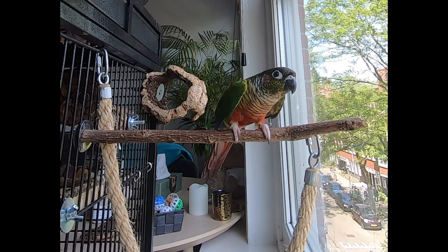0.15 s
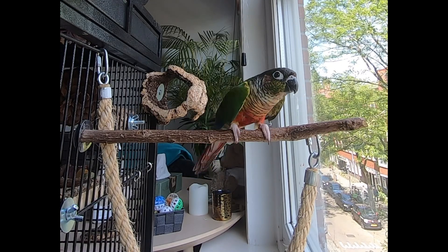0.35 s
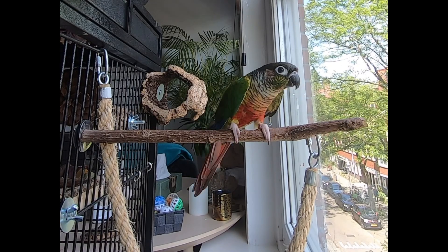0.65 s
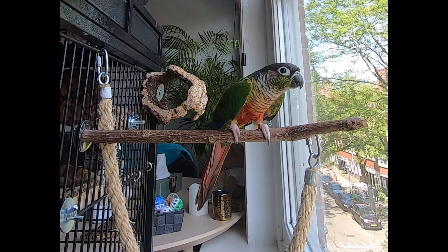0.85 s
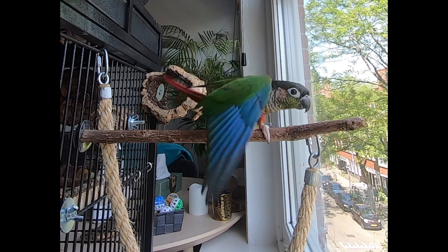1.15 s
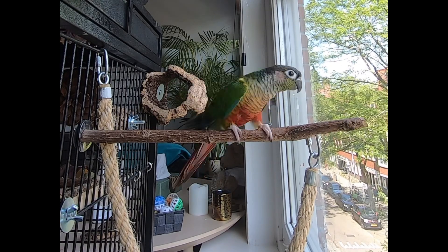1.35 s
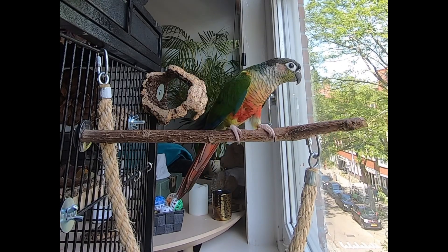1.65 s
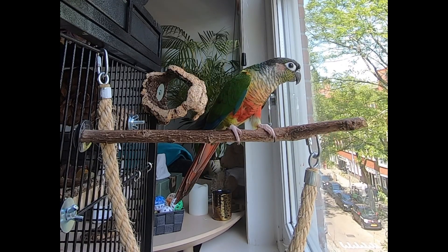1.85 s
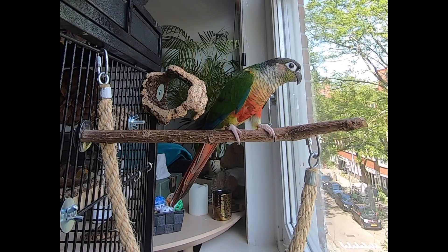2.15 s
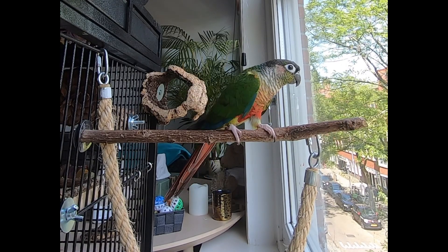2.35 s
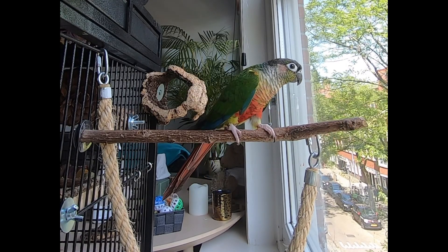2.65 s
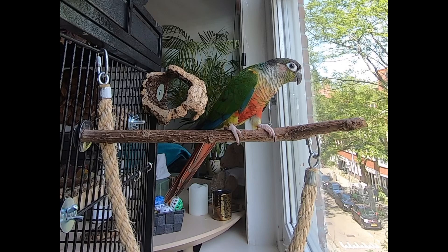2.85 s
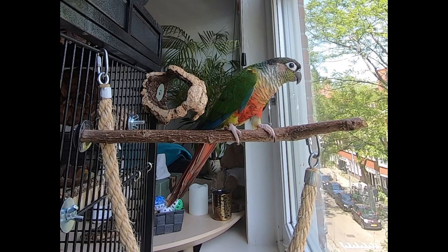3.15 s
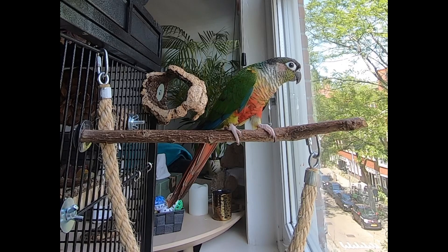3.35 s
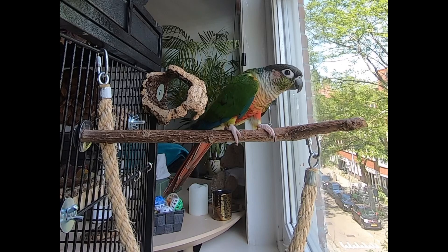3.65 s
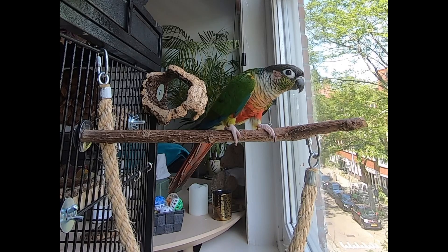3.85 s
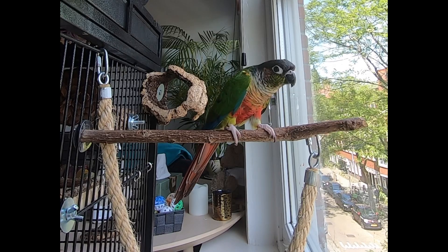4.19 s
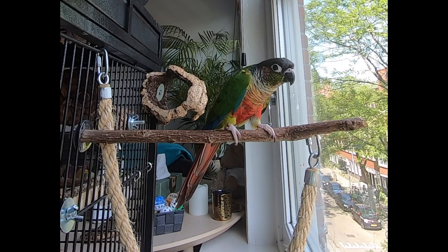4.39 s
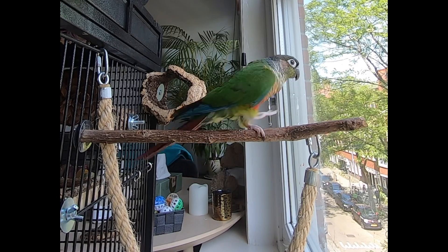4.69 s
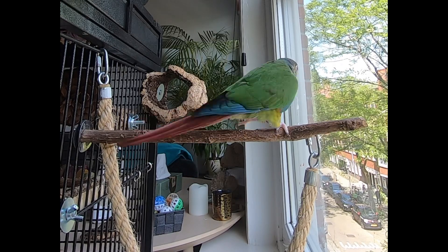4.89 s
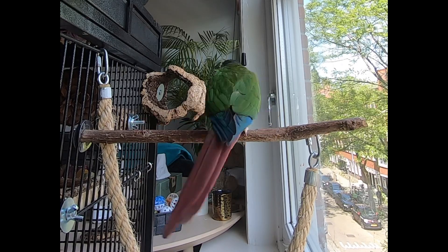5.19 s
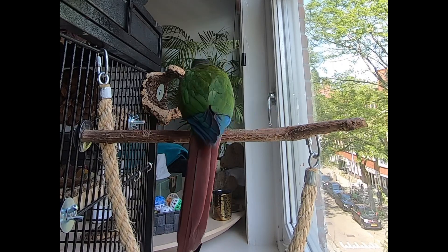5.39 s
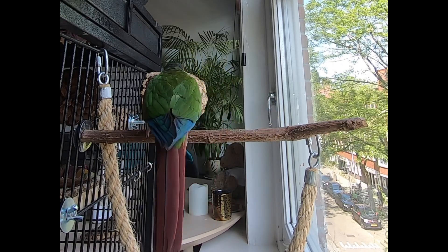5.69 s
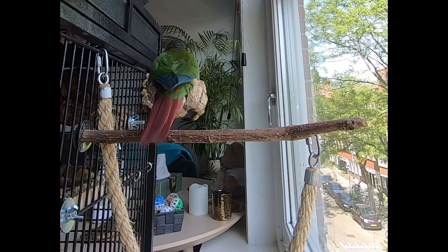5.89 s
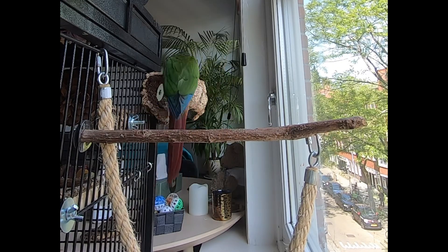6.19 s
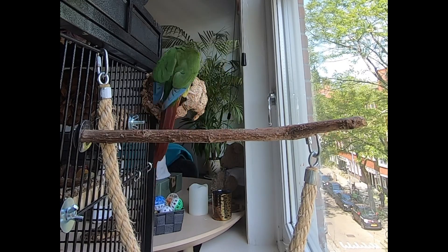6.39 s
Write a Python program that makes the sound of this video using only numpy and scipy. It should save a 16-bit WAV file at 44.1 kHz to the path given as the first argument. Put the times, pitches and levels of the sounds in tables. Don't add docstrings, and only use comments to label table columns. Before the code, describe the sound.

A small parrot close to the microphone lets out five very loud, shrill shrieks, each a fifth of a second, a whistle cracking into a harsh rasp. The hard room rings briefly after each. Between them are faint beak clicks, perch thumps and creaks over low traffic hum. Finally the shrieking stops and claws tick along wood, then scratch and knock on a wicker basket.

```python
import sys
import numpy as np
from scipy import signal
from scipy.fft import rfft, irfft, next_fast_len
from scipy.io import wavfile
from scipy.ndimage import uniform_filter1d, minimum_filter1d, map_coordinates

SR = 44100
rng = np.random.default_rng(int(sys.argv[2]) if len(sys.argv) > 2 else 0)


def to_wav(sig):
    pcm = np.clip(np.atleast_2d(sig), -1, 1) * 32767
    pcm = np.round(pcm).astype(np.int16)
    wavfile.write(sys.argv[1], SR, pcm.T)


def ratio_of_db(decibels):
    return 10 ** (np.asarray(decibels, float) / 20)


N = 287973


def unit(x):
    return x / np.sqrt(np.mean(x ** 2) + 1e-20)


def along(points, hz):
    f, v = np.transpose(points)
    return np.interp(np.log(hz + 1), np.log(f + 1), v)


def curves(rows):
    s, *cols = np.transpose(rows)
    return [np.interp(np.arange(N) / SR, s, c) for c in cols]


def wobble(rate):
    knots = rng.standard_normal(int(N * rate / SR) + 4)
    return map_coordinates(knots, [np.arange(N) * rate / SR])


def tremor(rate):
    return np.tanh(wobble(rate))


def filtered(x, response):
    m = next_fast_len(N + SR // 2)
    return irfft(rfft(x, m) * response(np.fft.rfftfreq(m, 1 / SR)), m)[..., :N]


def modes(table):
    def response(f):
        return sum((-1) ** k * ratio_of_db(db) * 1j * f * width / (hz * hz - f * f + 1j * f * width)
                   for k, (hz, width, db) in enumerate(table))
    return response


def highpass(f, corner_hz):
    return (1j * f / corner_hz / (1 + 1j * f / corner_hz)) ** 2


def mix_in(track, at, sound):
    track[..., at:at + sound.shape[-1]] += sound[..., :N - at]


# start_s, length_s, rasp_db, rasp_low_band_db, held_note_roughness (0-1)
SHRIEKS = [(.263, .195, -25.5, -13, .06), (.838, .202, -25, -7.5, .06), (2.26, .196, -23.5, -1, .25),
           (3.577, .18, -24, -4, .25), (4.651, .196, -25, -3, .2)]
# scoop_hz, opening_hz, dip_s (into the call), dip_hz, last_hz
TUNES = [(3650, 3560, .043, 2050, 4000), (3700, 3760, .045, 2300, 3820), (3300, 3550, .037, 2650, 4130),
         (2600, 3900, .044, 2280, 4170), (2800, 3450, .045, 2170, 4180)]
# opening_db, before_break_db, in_dip_db, held_db, last_db
EFFORT = [(-19.5, -21, -17, -17.5, -29.5), (-21, -28, -21, -20, -24.5), (-21, -19, -20.5, -20, -26.5),
          (-23, -24, -16.5, -24, -21.5), (-16, -26, -14, -18, -24)]
# start_hz, dip_hz, end_hz
THROAT_HZ = [(6595, 6230, 6550), (6130, 6250, 6560), (7170, 6600, 6760), (6930, 6700, 6800),
             (6590, 6800, 7140)]
GAPE_DIP_DB = [10.5, -1, -4, -3, 1]
ATTACK_S, RELEASE_S, EDGE_DB = .011, .01, -12
BREAK_S, SNAP_S, CLIMB_S, SETTLE_S = .015, .004, .011, .028


def phrase(shape):
    points = []
    for call in zip(SHRIEKS, TUNES, EFFORT, THROAT_HZ, GAPE_DIP_DB):
        start = call[0][0]
        points += [(start + s, *values) for s, *values in shape(*call)]
    return curves(points)


def sounding(fade):
    t = np.arange(N) / SR
    return sum(np.clip(np.minimum(t - s, s + length - t) / fade, 0, 1) for s, length, *_ in SHRIEKS)


def tune_of(call, tune, *_):
    _, length, _, _, held = call
    scoop, opening, dip_s, dip, last = tune
    rough_open, rough_break, rough_dip, rough_end = .07, .27, .15, .26
    break_hz, climb_hz, leap_hz, settle_hz = 2700, 3000, 3250, 3700
    scoop_s = abs(opening - scoop) / 9e4
    glide = lambda share: settle_hz + share * (last - settle_hz)
    middle = .15 + 2.2 * held
    return [(0, scoop, rough_break),
            (SNAP_S + scoop_s, opening, rough_open),
            (dip_s - BREAK_S - SNAP_S, opening, rough_open),
            (dip_s - BREAK_S, break_hz, rough_break),
            (dip_s, dip, rough_dip),
            (dip_s + CLIMB_S, climb_hz, rough_break),
            (dip_s + SETTLE_S - SNAP_S, leap_hz, rough_break),
            (dip_s + SETTLE_S, settle_hz - 600 * held, held),
            (.62 * length, glide(middle), held),
            (.78 * length, glide(.88), .2),
            (length, last, rough_end)]


def effort_of(call, tune, effort, throat, gape_db):
    length, dip_s = call[1], tune[2]
    opening, lull, push, held, last = effort
    gape_open, gape_held = 2.5, -3.5
    return [(0, opening + EDGE_DB, gape_open),
            (ATTACK_S, opening, gape_open),
            (dip_s - BREAK_S - SNAP_S, lull, gape_open),
            (dip_s, push, gape_db),
            (dip_s + 1.5 * SETTLE_S, held, gape_held),
            (length - RELEASE_S, last, gape_held),
            (length, last + .5 * EDGE_DB, gape_held)]


# multiple (of the pitch), level_db
OVERTONES = [(1, 0.5), (2, -1), (3, -20), (4, -28)]
# freq_hz, gain_db
THROAT = [(1500, -9), (2300, 8.5), (3800, 4), (4300, -0.5), (5200, -8.5), (6500, -3.5), (7600, -9),
          (8400, -3), (9300, -18), (11000, -24), (14000, -4.5)]


def whistle():
    hz, rough = phrase(tune_of)
    db, gape_db = phrase(effort_of)
    slide = uniform_filter1d(abs(np.gradient(hz)), size=300) * SR
    rough = rough + np.clip(slide / 4e5, 0, .2)
    shake = rough * (.13 * wobble(1000) + .08 * wobble(260))
    phase = 2 * np.pi * np.cumsum(hz * (1 + shake)) / SR
    tone = np.zeros(N)
    for k, level in OVERTONES:
        partial_db = level + (k > 1) * gape_db + along(THROAT, k * hz)
        tone += ratio_of_db(partial_db) * np.sin(k * phase)
    flutter = ratio_of_db(6.2 * tremor(130) + 20 * rough * (tremor(330) - 1.0))
    return ratio_of_db(db - 2.0) * flutter * tone * sounding(.003)


def rasp_of(call, tune, effort, throat, _):
    _, length, db, low, _ = call
    dip_s = tune[2]
    first, mid, last = throat
    high, bright = -16, -16 + 6.5
    return [(0, db + EDGE_DB - 2, first, low + 4, high),
            (ATTACK_S, db - 4, first, low + 4, high),
            (dip_s - BREAK_S - SNAP_S, db - 5.5, first, low, high),
            (dip_s + CLIMB_S, db, mid, low, high),
            (length - RELEASE_S, db - 3.5, last, low - 3, bright),
            (length, db + EDGE_DB + 3.5, last, low - 3, bright)]


# freq_hz, density_db (per Hz)
BREATH = [(290, -71.5), (500, -42.5), (927, -39), (1390, -22), (2130, -15.5), (2970, -7.5), (3330, -8),
          (3730, -1), (4840, -18), (6730, -10.5), (9640, -18), (11400, -43), (15500, -38.5)]


def rasp():
    db, throat_hz, low_db, high_db = phrase(rasp_of)
    shake = .44 * (.085 * wobble(1300) + .035 * wobble(250))
    phase = np.pi * np.cumsum(throat_hz * (1 + shake)) / SR
    split = np.cos(2 * np.pi * np.cumsum(450 + 150 * wobble(90)) / SR)
    low = ratio_of_db(low_db + 1.8 * tremor(700)) * np.sin(phase) * (0.32 + 1.5 * split)
    middle = ratio_of_db(7.2 * tremor(500)) * np.sin(2 * phase)
    high = ratio_of_db(high_db + 5.6 * tremor(400)) * np.sin(3 * phase)
    hiss = unit(filtered(rng.standard_normal(N), lambda hz: ratio_of_db(along(BREATH, hz))))
    body = low + middle + high + ratio_of_db(-1.5) * hiss
    return ratio_of_db(db + 3.4 * tremor(230)) * body * sounding(.004)


# start_s, peak_db, ring_hz
ONSETS = [(0.2461, -37, 1400), (0.2548, -24, 1900), (.261, -29.5, 2300), (0.8261, -36.5, 1500),
          (0.832, -26.5, 2400), (2.2396, -32.5, 1500), (2.248, -25.5, 1900), (3.5626, -33, 1400),
          (3.5698, -33, 2200), (3.576, -21.5, 2000), (4.633, -42, 1500), (4.6418, -21.5, 1600),
          (4.6534, -20.5, 2400)]
# freq_hz, level_db
WINDPIPE = [(3500, -6.5), (5000, -13), (6500, -11.5), (9200, -23)]


def flaps():
    out, t = np.zeros(N), np.arange(SR // 50) / SR
    for s, db, hz in ONSETS:
        ring = np.sin(2 * np.pi * hz * t)
        for f, level in WINDPIPE:
            ring += ratio_of_db(level + rng.normal(0, 2.1)) * np.sin(2 * np.pi * f * rng.normal(1, 0.065) * t)
        breathy = 1 + 2.1 * uniform_filter1d(rng.standard_normal(len(t)), size=12)
        envelope = ratio_of_db(db + 12.0 - 60 * t / .011) * (1 - np.exp(-t / 0.00093)) ** 2
        mix_in(out, round(s * SR), envelope * ring * breathy)
    return filtered(out, lambda f: highpass(f, 1100) / (1 + 1j * f / 7000) ** 3)


def padded(table, top_hz):
    return lambda f: modes(table)(f) / (1 + 1j * f / top_hz) ** 2


# start_s, peak_db, ring_hz
BEAK = [(0.2149, -46, 8000), (3.277, -45.5, 8160), (3.3548, -42.5, 6920), (4.4433, -45.5, 7950),
        (5.2904, -44, 6800)]
# start_s, peak_db, ring_hz
CLAWS = [(1.8007, -58.5, 2706), (1.8594, -60, 2800), (1.9944, -66, 3120), (4.4301, -60, 2540),
         (5.2514, -57.5, 3600), (5.448, -57.5, 2760), (5.5374, -60.5, 3150), (5.5895, -61, 5760),
         (5.7012, -66.5, 4950), (5.725, -56.5, 3110), (5.7774, -62.5, 4910), (5.8197, -62.5, 4465),
         (5.8786, -61, 2444), (5.9295, -54, 2880), (5.9943, -41, 3000)]
# start_s, peak_db, ring_hz
BASKET = [(1.42, -55, 1610), (2.8302, -56, 4500), (6.0516, -41, 3370), (6.0671, -42, 3150),
          (6.099, -46, 2830), (6.1489, -51, 2630), (6.2347, -56, 3070), (6.254, -49, 4940),
          (6.2936, -42.5, 3190), (6.3201, -52.5, 2800), (6.3875, -45, 3235), (6.4144, -63, 3210),
          (6.4964, -51.5, 3200)]
# freq_hz, width_hz, level_db
WICKER = [(750, 350, -3), (1450, 68, 7.5), (1550, 150, 5.5), (2186, 700, 0)]
# freq_hz, width_hz, level_db
PERCH = [(173, 29, 1), (230, 20, 3.5), (443, 270, -12.5)]
# freq_hz, density_db (per Hz)
FEATHERS = [(500, -25.5), (1000, -2.5), (1800, -1), (3500, -3.5), (4500, 0), (7500, -3), (9500, -7),
            (11000, -26.5), (13000, -57)]
# freq_hz, width_hz, level_db
CAGE = [(3400, 160, 5), (4500, 160, 8)]


def contacts():
    tick, knock, thud = np.zeros((3, N))
    scuff, scrape = np.zeros((2, 2, N))
    t = np.arange(SR // 4) / SR
    # wicker knock dB, perch thud dB, scuff dB, wicker scrape dB.
    kinds = [(BEAK, (-27, -14, -15.5, -40)), (CLAWS, (-18.5, 0, -14, -30.5)), (BASKET, (-9, -14, -18, -8.5))]
    events = [row + mix for rows, mix in kinds for row in rows]
    for s, db, hz, knock_db, thud_db, scuff_db, scrape_db in events:
        at, noise = round(s * SR), rng.standard_normal((3, len(t)))
        contact_s = .0002 * (8000 / hz) ** 2
        strike = ratio_of_db(db + 5 - 60 * t / (0.0081 + 6 * contact_s)) * (1 - np.exp(-t / contact_s))
        mix_in(tick, at, strike * (0.35 * np.sin(2 * np.pi * hz * t) + 0.6 * noise[2]))
        peak = signal.lfilter(*signal.iirpeak(hz, 3.5, SR), noise[:2])
        band = signal.butter(1, [.4 * hz, min(2.2 * hz, 12000)], 'band', fs=SR)
        fibres = peak + 0.5 * signal.lfilter(*band, noise[:2])
        mix_in(scuff, at, ratio_of_db(db + scuff_db + 9.5 - 60 * t / 0.43) * (1 - np.exp(-t / 0.004)) * fibres)
        mix_in(scrape, at, ratio_of_db(db + scrape_db - 60 * t / .4) * (1 - np.exp(-t / .008)) * noise[:2])
        knock[at] = ratio_of_db(db + knock_db + 38)
        thud[at] = ratio_of_db(db + thud_db + 36.0)
    bright = filtered(tick, lambda f: highpass(f, 1800) / (1 + 1j * f / 9000 - (f / 10000) ** 2) ** 3)
    ticks = bright + filtered(knock, padded(WICKER, 2700))
    thuds = filtered(thud, padded(PERCH, 500))
    feathers = filtered(scuff * ratio_of_db(4.4 * tremor(120)),
                        lambda hz: ratio_of_db(along(FEATHERS, hz)) * (1 + modes(CAGE)(hz)))
    wicker = filtered(scrape * ratio_of_db(5 * tremor(43)), modes(WICKER[1:]))
    return ticks, thuds, feathers + wicker


# start_s, peak_db, creak_db
STEPS = [(0.664, -52, -7.5), (1.088, -46, -10.5), (1.17, -40, -11.5), (1.438, -46.5, -14),
         (3.497, -54, -20.5), (5.09, -43, -21), (5.129, -50, -19), (5.221, -45, -18.5),
         (5.319, -44.5, -14.5), (5.382, -54, -22.5)]
# freq_hz, width_hz, level_db
CREAK = [(396, 120, 2), (635, 74, 1.5), (851.4, 58, -9)]


def weight_shifts():
    thud, creak = np.zeros((2, N))
    for s, db, creak_db in STEPS:
        at = round(s * SR)
        thud[at], creak[at] = ratio_of_db(db + 38.0), ratio_of_db(db + creak_db + 44)
    t = np.arange(SR // 4) / SR
    strain = ratio_of_db(-60 * t / 0.2) * (1 - np.exp(-t / .004)) * rng.standard_normal(len(t))
    creak = signal.fftconvolve(creak, strain / np.linalg.norm(strain))[:N]
    return filtered(thud, padded(PERCH, 500)) + filtered(creak, padded(CREAK, 1200))


# time_s, left_minus_right_db, left_lag_samples, left_echo_ms, right_echo_ms
HEAD = [(.3, -0.8, 0.51, 0.51, 0.75), (1, -0.14, 0.73, .7, .6), (2.3, 1.5, 0.93, .45, 0.37),
        (3.6, 1.2, .3, 0.48, 0.35), (4.7, 1.6, .3, .38, 0.41), (6.2, 1.1, 0.066, .8, 0.52)]
# delay_ms, left_gain, right_gain
NEAR = [(.2, 0.09, -0.1), (1.1, 0.12, -0.29), (1.7, -0.059, 0.6), (3.1, 0.35, -0.32), (5.6, .1, 0.14),
        (9.3, .2, 0.2)]
# freq_hz, left_minus_right_db
PORTS = [(60, -1), (150, 2.5), (380, 3), (950, -7), (2380, 4), (5980, -7), (15000, -3)]


def direct(x):
    pan_db, lag, *pane_ms = curves(HEAD)
    late = lambda samples: map_coordinates(x, [np.arange(N) - samples])
    pair = np.array([ratio_of_db(side * pan_db) * (late(side * lag) + 0.11 * late(ms * SR / 1000))
                     for side, ms in zip((.5, -.5), pane_ms)])

    def surfaces(hz):
        near = 1 + sum(np.outer(gains, np.exp(-2j * np.pi * hz * ms / 1000)) for ms, *gains in NEAR)
        return near * ratio_of_db(along(PORTS, hz) * [[.5], [-.5]])
    return filtered(pair, surfaces)


# freq_hz, t60_s
ROOM = [(200, 1), (1500, 0.41), (4000, 0.51), (7000, 0.41), (10000, .4), (14000, 0.36)]


def room(x):
    hz, t, z = signal.stft(rng.standard_normal((2, SR)), SR, nperseg=256)
    decay = ratio_of_db(-60 * t / along(ROOM, hz)[:, None])
    tail = signal.istft(z * decay, SR, nperseg=256)[1]
    build_up = 1 - np.exp(-np.arange(tail.shape[1]) / SR / 0.0022)
    tail = (tail + 0.36 * tail[::-1]) * build_up
    return signal.fftconvolve(x[None], tail / np.linalg.norm(tail[0]), axes=1)[:, :N]


# freq_hz, angle_rad
TWIST = [(600, 0), (1300, 0.34), (2400, -.2), (3700, .25), (4400, -.3), (5500, 0.96), (6500, -0.84),
         (8600, 0.97), (10500, 0.075)]


def housing(pair):
    return filtered(pair, lambda hz: np.exp(1j * along(TWIST, hz) * [[-.5], [.5]]))


def rush(spectrum, alike):
    def mid_side(hz):
        turn = np.arccos(np.clip(along(alike, hz), -1, 1)) / 2
        return ratio_of_db(along(spectrum, hz)) * [np.cos(turn), np.sin(turn)]
    mid, side = filtered(rng.standard_normal((2, N)), mid_side)
    return unit(np.array([mid + side, mid - side]))


# time_s, hum_db
STREET = [(0.0, -68), (0.33, -62), (0.6, -71), (1.24, -59), (1.6, -68), (2.42, -63.5), (2.51, -71.5),
          (3.38, -66.5), (3.64, -59), (3.75, -71), (4.58, -67.5), (4.64, -59.5), (5.05, -65), (5.09, -57),
          (5.49, -64), (6.53, -58)]
# freq_hz, density_db (per Hz)
HUM = [(53, -59), (90, -26.5), (114, -30.5), (132, -8.5), (147, -0.5), (246, -1.5), (292, -11.5),
       (499, -15.5), (567, -21), (733, -15), (990, -22.5), (1310, -18), (2180, -27.5), (10600, -52),
       (15000, -56.5)]
# freq_hz, likeness (-1 to 1)
ALIKE = [(60, 0.97), (180, 0.88), (550, 0.4), (1650, -0.5), (4970, 0.36), (15000, -0.085)]
# freq_hz, density_db (per Hz)
RUMBLE = [(20, -12.5), (40, -13), (58, -1.5), (75, -9.5), (110, -37)]
# centre_s, half_length_s, level_db
SWAYS = [(.73, .05, -71), (1.2, .06, -76.5), (1.78, .12, -73), (3.561, .06, -72), (5.079, .06, -61.5),
         (5.498, .15, -77), (5.898, .08, -65.5), (6.095, .1, -59.5)]


def background():
    (hum_db,), t = curves(STREET), np.arange(N) / SR
    tone = rush(HUM, ALIKE)
    bass = filtered(tone, lambda hz: hz < 380)
    traffic = ratio_of_db(hum_db + 0.7 + 0.81 * wobble(9.8)) * bass
    steady = ratio_of_db(-63 + 0.32 * wobble(8.8)) * (tone - bass)
    rocking = ratio_of_db(-86 + 5.5 * wobble(4))
    for s, half, db in SWAYS:
        rocking += ratio_of_db(db) * np.exp(-((t - s) / half) ** 2)
    return traffic + steady + rocking * rush(RUMBLE, [(50, .96)])


def scene():
    voice = whistle() + rasp() + flaps()
    ticks, thuds, rustle = contacts()
    thuds = thuds + weight_shifts()
    echo = ratio_of_db(-5.5) * room(voice)
    tail = echo[:, round(2.74 * SR):round(3.2 * SR)]
    earlier = np.pad(tail, ((0, 0), (0, N)))[:, :N]
    clatter = ratio_of_db(-1) * room(ticks + .4 * thuds)
    airborne = direct(ratio_of_db(-2.5) * voice + ticks) + echo + ratio_of_db(4.5) * earlier + clatter
    return housing(airborne) + thuds + rustle + background()


def limited(x):
    ceiling, span = .45, int(.0015 * SR)
    need = minimum_filter1d(np.minimum(1, ceiling / (abs(x).max(axis=0) + 1e-9)), size=2 * span)
    return x * uniform_filter1d(need, size=span)


def band_limit(x):
    return signal.sosfilt(signal.butter(12, 15630, fs=SR, output="sos"), x)


# freq_hz, gain_db
MIC = [(9500, 1), (10800, -13.5), (12200, -15), (13000, -13), (13700, 0.5), (15000, 2.5)]


def record(dry):
    heard = filtered(dry, lambda hz: ratio_of_db(along(MIC, hz)))
    mix = limited(heard)
    return band_limit(mix)


dry = scene()
out = record(dry)
to_wav(out)
```